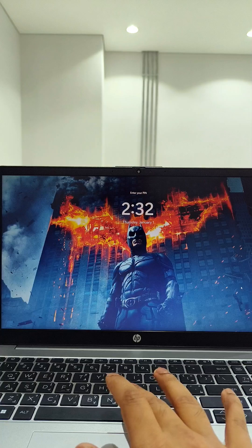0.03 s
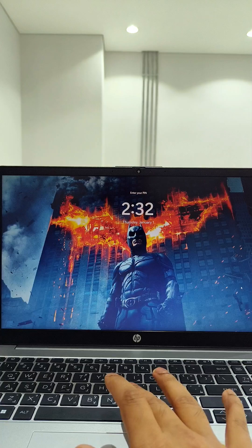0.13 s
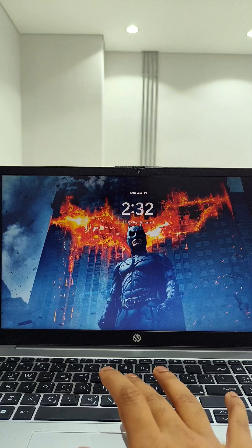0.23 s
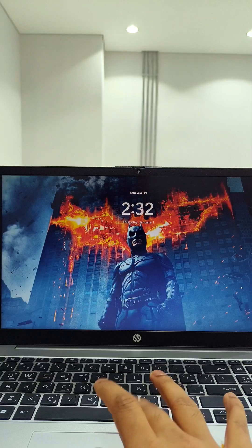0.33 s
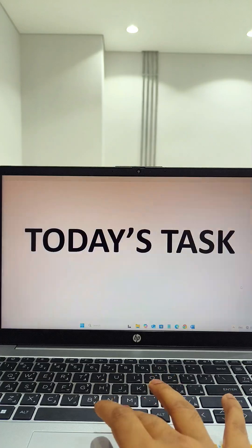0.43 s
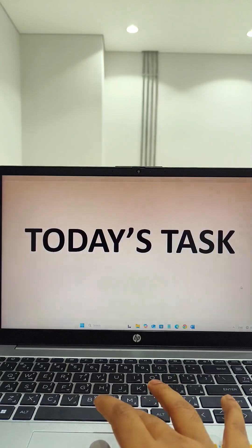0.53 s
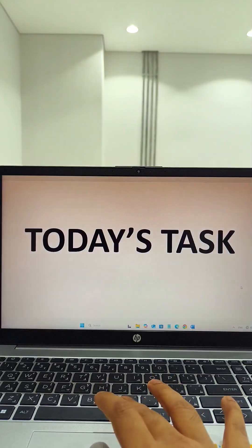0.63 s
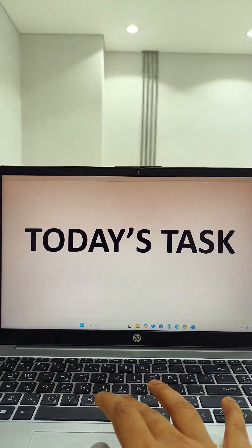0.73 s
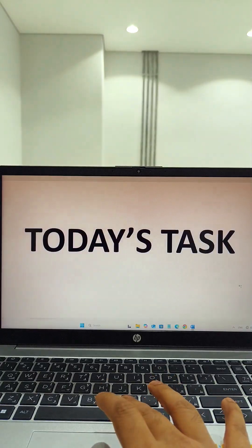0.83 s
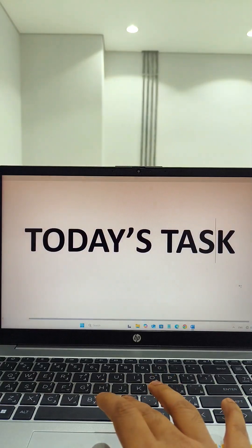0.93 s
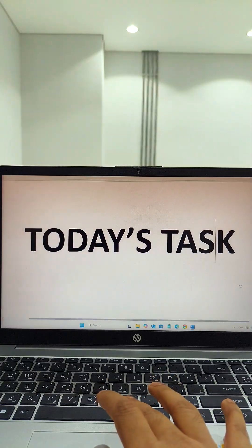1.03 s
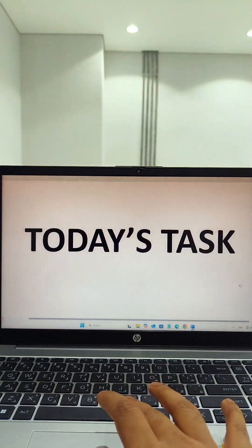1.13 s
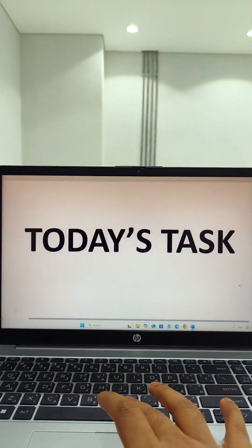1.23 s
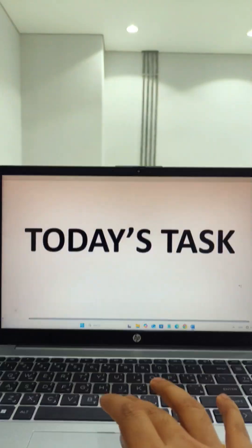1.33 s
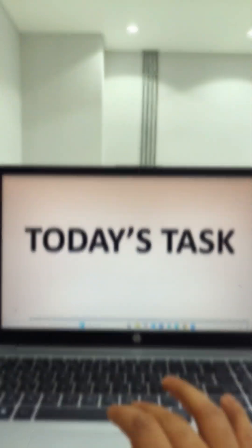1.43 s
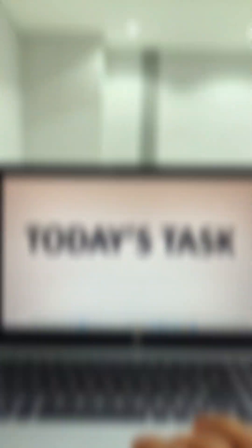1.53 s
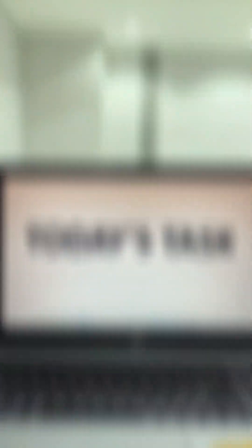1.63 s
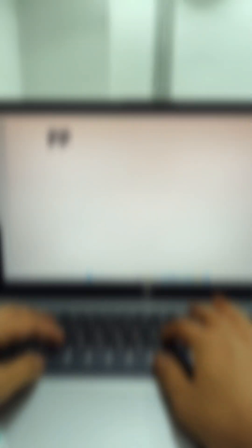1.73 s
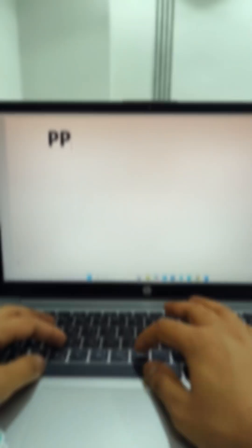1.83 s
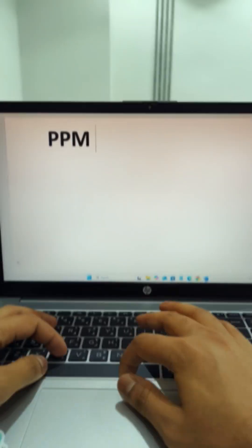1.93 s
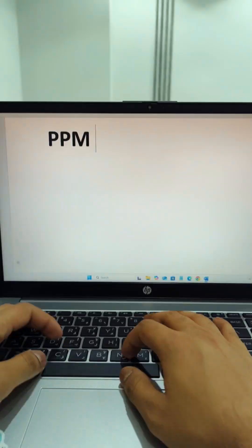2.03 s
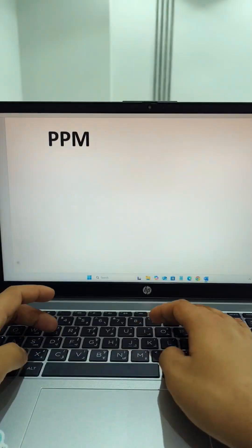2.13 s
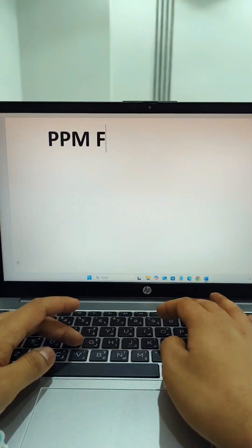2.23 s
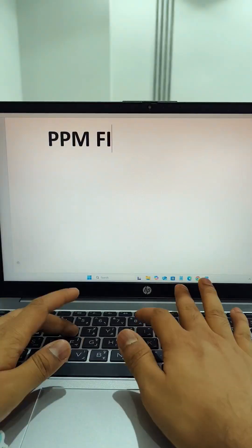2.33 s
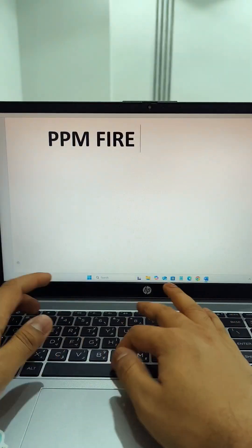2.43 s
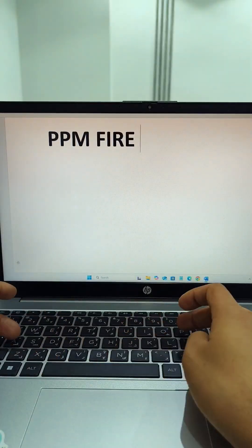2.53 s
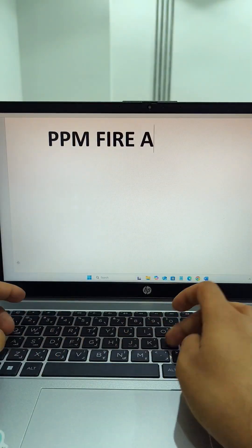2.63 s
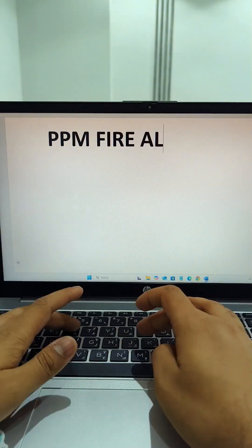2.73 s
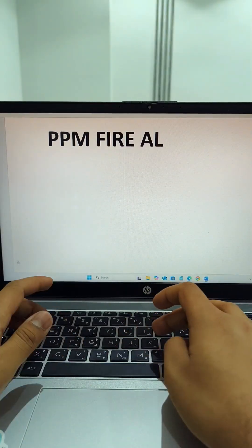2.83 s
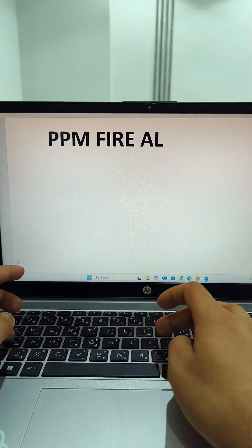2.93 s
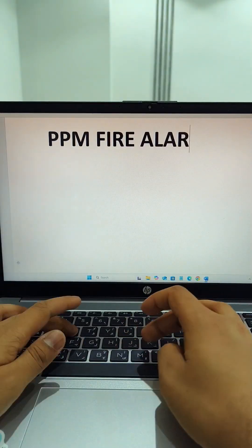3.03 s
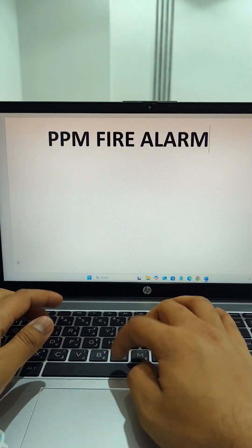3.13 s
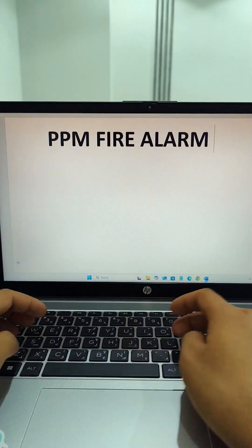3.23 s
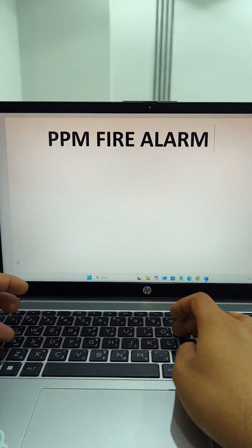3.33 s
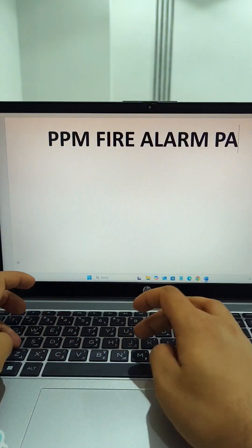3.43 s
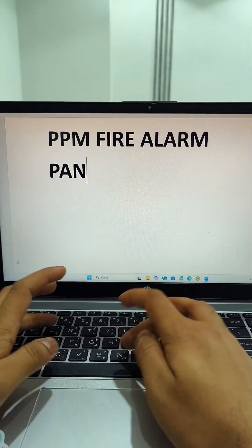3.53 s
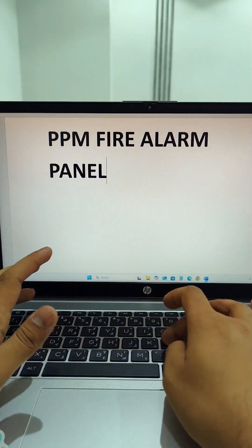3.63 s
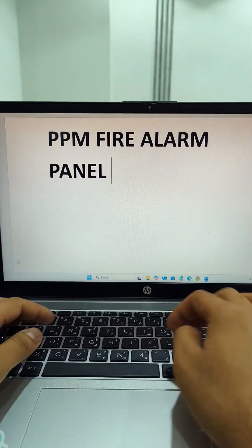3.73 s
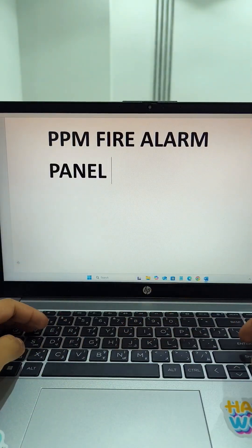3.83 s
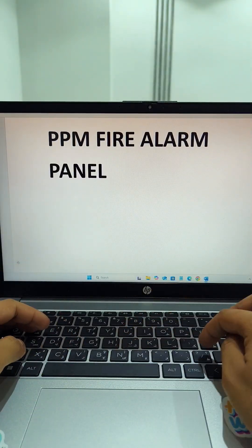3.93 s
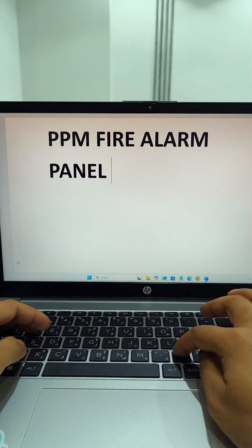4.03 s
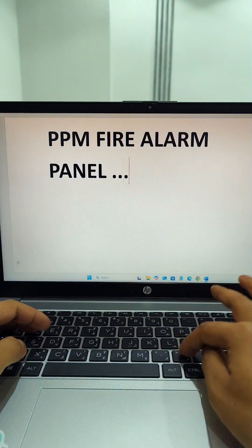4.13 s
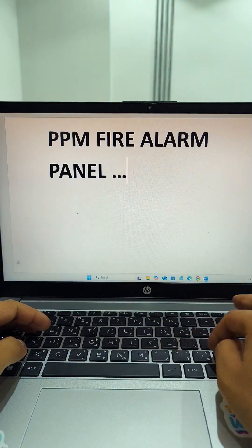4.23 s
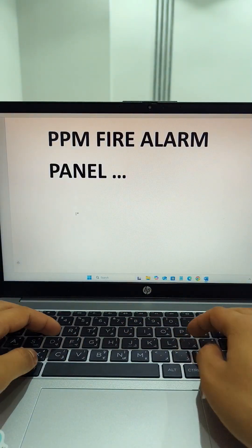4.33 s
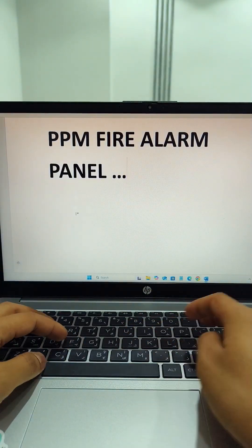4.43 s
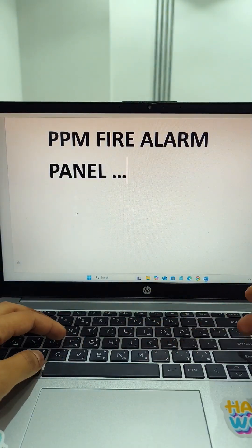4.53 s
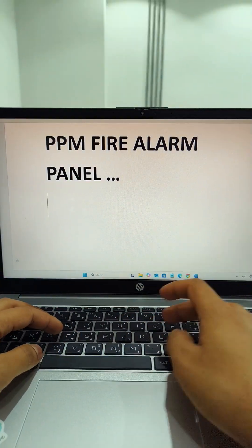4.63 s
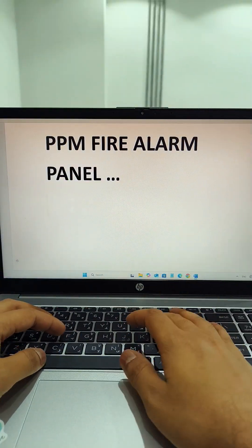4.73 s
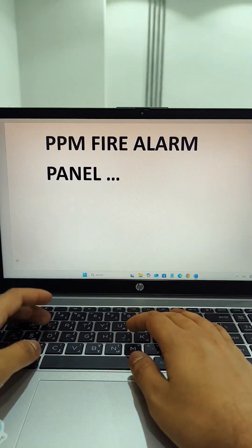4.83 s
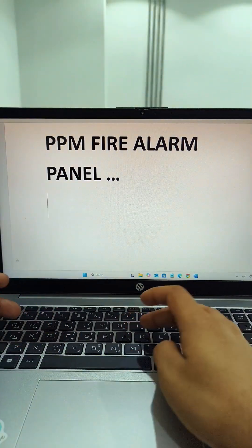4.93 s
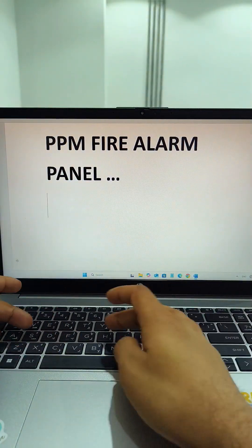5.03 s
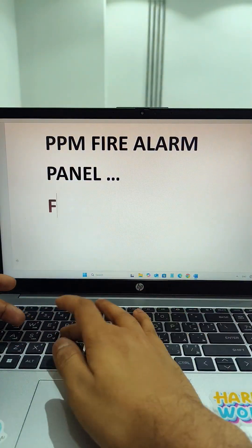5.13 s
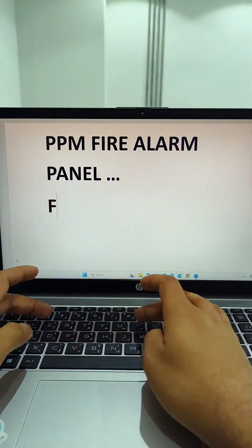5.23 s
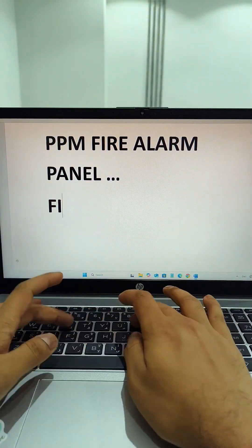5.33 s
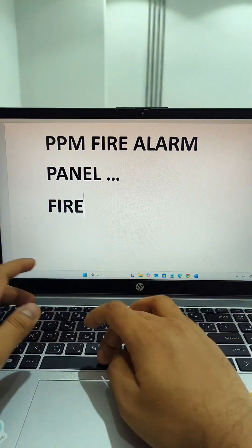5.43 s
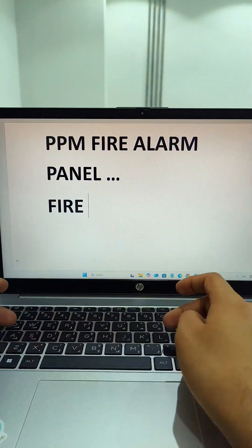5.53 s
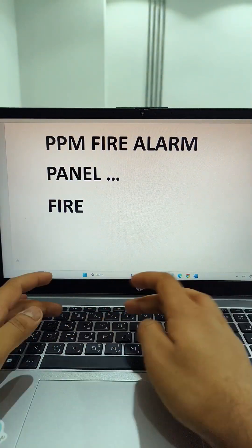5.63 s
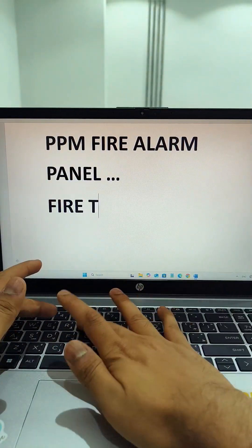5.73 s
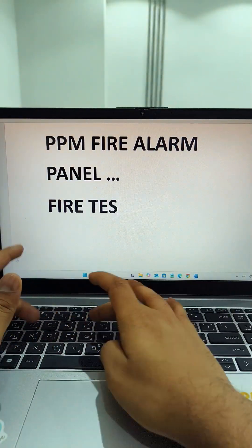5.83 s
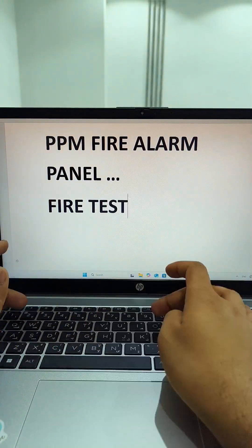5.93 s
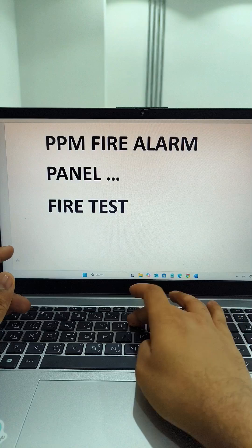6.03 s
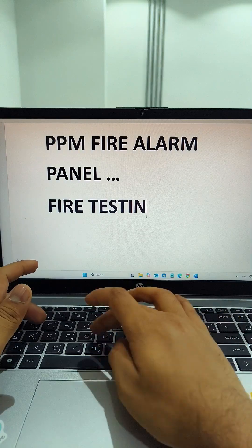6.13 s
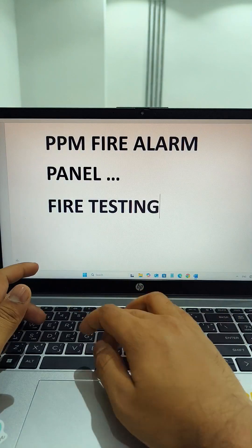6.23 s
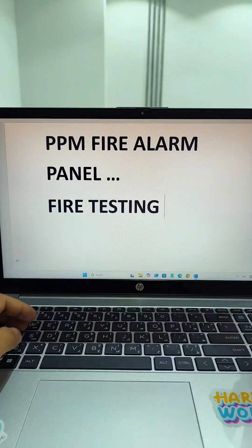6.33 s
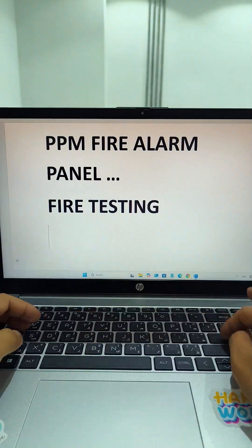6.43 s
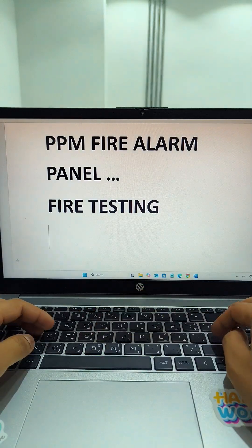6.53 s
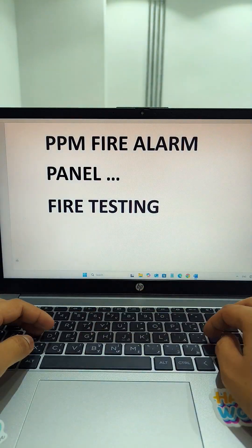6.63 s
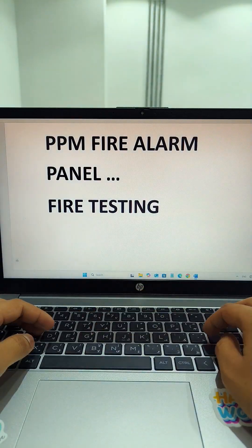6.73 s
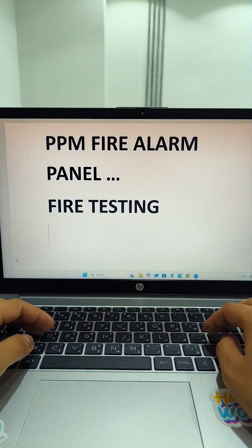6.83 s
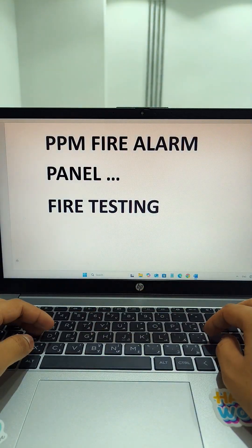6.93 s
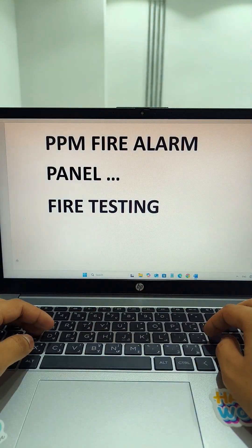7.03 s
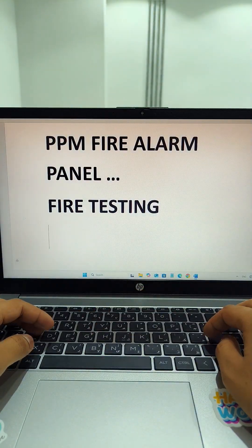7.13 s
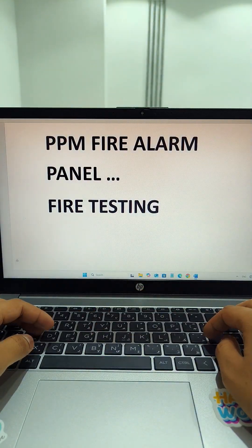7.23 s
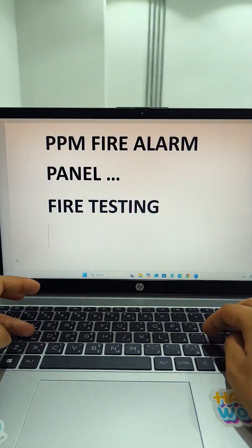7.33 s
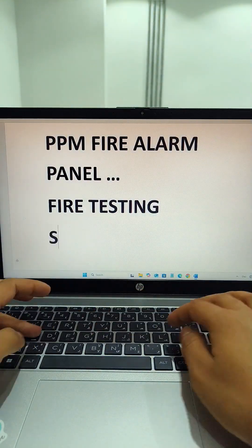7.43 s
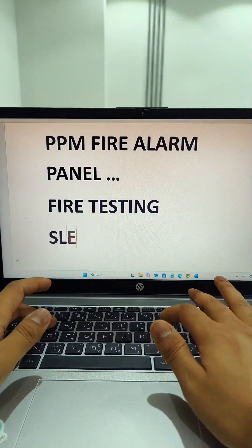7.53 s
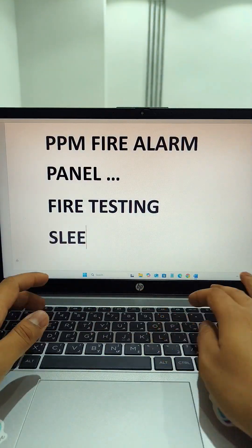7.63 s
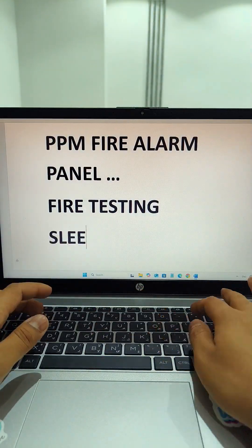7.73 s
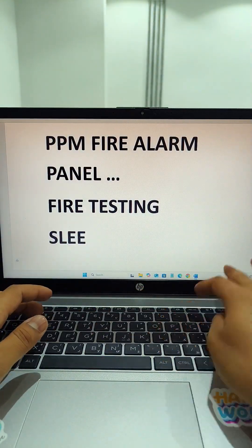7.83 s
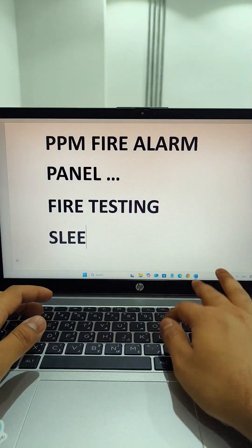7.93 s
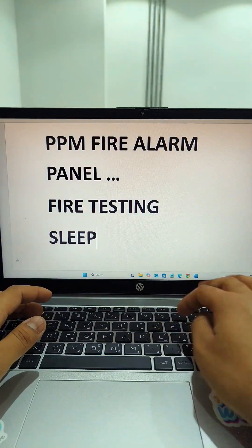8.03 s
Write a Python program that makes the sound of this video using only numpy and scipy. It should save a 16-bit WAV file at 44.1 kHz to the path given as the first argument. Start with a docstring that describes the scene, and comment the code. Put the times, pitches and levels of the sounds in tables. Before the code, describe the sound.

From 0 to 1.7 s the sound is wide and very quiet: a muted double-contact finger tap at 0.43 s, another at 0.63 and a weaker one at 1.35. They ring through a diffuse room tail, with a low boom that swells again and stops near 0.9 s, and a narrow wavering whistle around 800 Hz on the right. It fades, then cuts to close mono at 1.73 s, where low rumble and two motor hums near 63 Hz swell in, beating about one and a half times a second under a very faint steady whine. Fast uneven typing starts around 2.07 s: crisp clicks, softer releases, case knocks, thin ticks and skin brushing. The loudest strike, with a heavy desk thump, lands near 4.07 s. Dense clicks continue to about 6.6, thin out with a firm stroke at 7.23, then cluster again from 7.7 to 8.07 s.

```python
"""A quiet room with a laptop, in two scenes. First, in stereo, one finger taps three times: struck modes
ring on in a noisy room tail, with a low boom and a flickering whistle, a narrow wandering tone on the right.
After a cut, in mono, two hands type fast: bursts of noise ring the key clicks and case knocks, damped low
swings make the desk thump, and skin brushes plastic as grainy noise. Behind them two motors, nearly in tune,
beat slowly over a low rumble of filtered noise and a faint steady whine."""
import sys
import numpy as np
from scipy import signal
from scipy.io import wavfile
from scipy.ndimage import uniform_filter1d

SR = 44100
rng = np.random.default_rng(int(sys.argv[2]) if len(sys.argv) > 2 else 0)


def bounce(signal):
    """Save signal as a 16-bit WAV file at the path given by the first command-line argument."""
    frames = np.transpose(np.atleast_2d(signal))
    limited = np.clip(frames, -1, 1)
    pcm = np.round(limited * 32767).astype(np.int16)
    wavfile.write(sys.argv[1], SR, pcm)


N = 356724  # length in samples

# Key contacts, bottoming out or springing back. Each row: time in seconds, click level in dB,
# case knock in dB relative to the click, upper click in dB relative to the lower click.
KEY_CONTACTS = [(2.0664, -20, -8, -4), (2.156, -45.5, -5, -5), (2.1693, -35, -6, 3), (2.19, -20, -7.5, 2),
                (2.2798, -20, -9, 2), (2.4012, -28, -6.5, 5), (2.501, -23, -2.5, -5),
                (2.5131, -25, -12.5, 15), (2.5362, -36.5, -6.5, -11), (2.597, -38, -11, -3),
                (2.6058, -31, -12, -9), (2.6145, -30.5, -11.5, 2), (2.683, -46, -4.5, -16),
                (2.713, -27, -9.5, 4), (2.7711, -37, -5, 7), (2.9193, -38, -8, -4), (2.9427, -20, -13, -6),
                (3.0863, -22, -8.5, 0.5), (3.1788, -42.5, 1.5, 5), (3.2099, -21.5, -9, 10),
                (3.3183, -42.5, -2, -8), (3.498, -23.5, -9, -17.5), (3.511, -38.5, -0.5, 3),
                (3.5767, -38, -8, -23), (3.591, -24, -8, -1), (3.6891, -40.5, 0, 1), (3.6982, -43.5, -4, 0),
                (3.9191, -20.5, -9.5, 4.5), (3.962, -34, -7.5, -11), (4.07, -13.5, -11.5, -8),
                (4.0758, -7.5, -11, 6), (4.126, -35, -11, 0), (4.1466, -12.5, -4, 0.5),
                (4.168, -30.5, -13, -4), (4.2381, -24, -6, -8), (4.3312, -20.5, -3.5, 3.5),
                (4.4126, -39, 1.5, 0), (4.4412, -19, -11.5, 2), (4.467, -38, 7.5, -10),
                (4.4855, -40, 1.5, -9), (4.5489, -17, -9.5, -4), (4.6048, -33.5, -6, -3),
                (4.6695, -17.5, -12, 3), (4.7652, -30, -8, -2), (4.825, -18.5, -4, -1),
                (4.844, -27.5, -12, -5), (4.9516, -20.5, -3, -2), (5.0939, -14.5, -11, -0.5),
                (5.1863, -33.5, -5.5, 8.5), (5.351, -39.5, -11.5, 17), (5.3664, -47, 4.5, -1.5),
                (5.4381, -23.5, -8, -10.5), (5.5455, -33.5, -6.5, -8), (5.5645, -28, -4, 13),
                (5.5774, -16, -12.5, -2), (5.617, -41, 2, 4), (5.641, -33, -7, -6), (5.6518, -28.5, -6, 10),
                (5.695, -39.5, -7, -3), (5.7207, -41, -8, -6), (5.7456, -22.5, -5.5, -25),
                (5.784, -18.5, -10.5, 8), (5.8762, -45.5, 2.5, 16), (5.897, -44.5, 6, 11),
                (5.966, -19, -7.5, 0.5), (5.9995, -38, 5.5, 3), (6.074, -48, 6.5, -6.5),
                (6.098, -33.5, -15, -6), (6.127, -21, -3.5, -1.5), (6.224, -16, -14, 3),
                (6.2279, -19.5, -8.5, -7), (6.3436, -34, -1.5, -1), (6.353, -23.5, -10, 7),
                (6.4096, -25, -7, -4), (6.5153, -27, -28.5, -10), (6.5421, -40, -11.5, -2),
                (6.594, -19, -8, -2.5), (6.685, -47, -12, -6), (6.8981, -34.5, -12, 10),
                (6.9362, -37.5, 0.5, 0), (7.0455, -46, 1, -14), (7.0545, -24, 0, 3),
                (7.2287, -16, -7.5, -1.5), (7.339, -44, -7, -20), (7.356, -31.5, -8, -2),
                (7.434, -23, -12, -4), (7.7245, -41.5, -4.5, 9.5), (7.7532, -31, -9, 4.5),
                (7.8178, -26.5, -10.5, 1.5), (7.825, -18.5, -9, -13), (7.8973, -33, -8, -2),
                (7.9188, -27, 2, 10), (7.9452, -32, 5, 2), (7.9933, -33.5, 0, -12), (8.005, -18, -12.5, 22),
                (8.0115, -17, -7.5, 27), (8.0675, -28, -3, 0)]
# What a struck key rings with: four rows each for case knock, lower click, upper click and fizz.
# Each row: pitch in Hz, width in Hz, level in dB within its group of four.
KEY_MODES = [(369, 290, -20), (781, 154, -13.5), (979, 353, -2), (1433, 760, -7), (1775, 352, -5),
             (2426, 1110, -4.5), (3326, 330, -2), (3613, 1015, 0.5), (4175, 1160, 22), (4750, 2160, 2),
             (5030, 1900, 11), (6660, 2200, -41.5), (7185, 2700, 4.5), (9690, 1060, 1.5),
             (11870, 4900, -7.5), (14000, 1700, -26)]
# Thin high ticks, alone or on top of a stroke. Each row: time in seconds, level in dB.
TICKS = [(2.5654, -34.5), (2.645, -48), (3.19, -49), (4.069, -16), (4.1472, -17.5), (4.8255, -25.5),
         (4.9528, -34), (5.7655, -36.5), (5.967, -32.5), (6.049, -52), (6.128, -30.5), (6.223, -24),
         (6.2737, -40), (6.314, -50), (7.0561, -32.5), (8.0453, -36.5)]
# A small stiff part rings on after a tick. One row: pitch in Hz, width in Hz, level in dB relative to the tick.
TICK_RING = (9700, 250, -4.5)
# Heavy strokes and wrists shake the desk. Each row: start in seconds, level in dB, pitch in Hz.
THUMPS = [(2.253, -39.5, 340), (2.65, -43, 279), (3.067, -38.5, 407), (3.64, -39, 304), (3.812, -35.5, 194),
          (4.069, -10.5, 128.3), (4.142, -17, 169), (4.328, -23.5, 187), (4.545, -20, 83.4),
          (5.096, -26.5, 227), (5.78, -21.5, 95), (5.903, -36, 360), (5.996, -17.5, 129.5),
          (6.218, -21.5, 174), (6.936, -21, 135.6), (7.534, -41, 332), (7.817, -27, 325), (7.921, -20, 164),
          (8.0, -20.5, 230)]
# The room after a key. Each row: centre in Hz, level in dB, time to fade by 60 dB in seconds.
TYPING_ROOM = [(321.6, -13, 0.22), (974, -13, 0.13), (1870, -21, 0.13), (3820, -30.5, 0.23),
               (8000, -22.5, 0.092), (12220, -28, 0.21)]
# Fingers shifting between strokes. Each row: middle in seconds, level in dB, length in milliseconds.
RUSTLES = [(2.651, -44, 18), (3.025, -57, 45), (3.75, -55.5, 146), (4.537, -35, 6.8), (5.415, -47, 11),
           (5.6, -43.5, 30), (5.71, -51, 52), (6.698, -55, 19), (6.847, -46, 11.6), (7.028, -55.5, 57),
           (7.62, -64, 10)]
# The finger brushes the cap before a full stroke and slides off after it.
# Each is one row: middle in seconds from the click, level in dB, length in milliseconds.
LAND = (-0.015, -61.5, 25.7)
LIFT = (0.092, -60.5, 40.3)
# The tone of skin on plastic. Each row: pitch in Hz, width in Hz, relative level in dB.
BRUSH_MODES = [(374, 83, 8.5), (888, 1220, 3.5), (3590, 1650, -1.5), (8850, 5400, -14.5)]
# Turning rates of the two motors, nearly in tune. One row: first motor in Hz, second motor in Hz.
MOTORS_HZ = (62.53, 64.03)
# Motor hum and overtones. Each row: multiple of the turning rate, level of the first motor in dB rms.
MOTOR_ORDERS = [(1, -49), (2, -57.5), (3, -68)]
# Shape of the rumble. Each row: frequency in Hz, relative level in dB per Hz.
RUMBLE = [(20, 14.5), (43, 6.5), (80, -2), (150, -5.5), (340, -28.5), (700, -39), (1000, -43.5)]
# Finger taps of the first scene. Each row: time in seconds, level in dB, contact setting in milliseconds,
# treble in dB counted from 16 dB below the tap, thud in dB relative to the tap.
TAPS = [(0.435, -41, 10.4, 14.5, -15), (0.4414, -29.5, 1.33, -11, -0.5), (0.629, -34.5, 2.3, 5.5, 0),
        (1.349, -45.5, 1.6, -22, -20)]
# What a tap rings with: one row of thud, three of knock, then the treble.
# Each row: pitch in Hz, width in Hz, level in dB within its group.
TAP_MODES = [(187.6, 64, 3), (473, 38, -9), (658, 138, -3), (1620, 860, -25), (4400, 2700, -23.5),
             (9100, 1100, -28.5), (14700, 670, -18.5)]
# Path of the whistle. Each row: time in seconds, level in dB before panning, centre in Hz.
WHISTLE = [(.43, -90.5, 777), (.46, -51, 770), (.59, -60, 780), (.63, -50, 780), (.76, -61.5, 766),
           (.96, -59.5, 820), (1.09, -69.5, 800), (1.17, -53, 813), (1.3, -76.5, 810), (1.44, -65.5, 800),
           (1.6, -72, 765)]
# The room after a tap. Each row: centre in Hz, level in dB, time to fade by 60 dB in seconds.
TAP_ROOM = [(657, -21.5, 0.45), (1690, -22.5, 0.66), (3260, -15.5, 0.6), (7240, -14.5, 0.28),
            (12400, -16.0, 0.24)]

TRAVEL_S = .015  # a blow starts with this much key travel
SCATTER_DB = 4.5  # how far each mode varies from blow to blow
# a flat, heavy finger knocks the case more, stays longer in contact and fizzes more
CONTACT_MS, LONGER_PER_KNOCK_DB, LONGEST_MS = 3.2, 0.1345, 5.5
USUAL_KNOCK_DB = -8
FIZZ_DB, FIZZ_PER_KNOCK_DB = -16, 0.58
TICK_MS = 0.86
FULL_STROKE_DB = -30  # a louder click means the key is driven home
# every full stroke also shakes the base: level relative to click, middle pitch, pitch spread
BASE_DB, BASE_HZ, BASE_SPREAD = -24, 304, 0.2
THUMP_T60_S = 0.087  # time to fade by 60 dB
RUSTLE_SCATTER_DB, HISS_DB = 5, -77
IN_STEP_S = 3.08  # the moment the motors run in step
RUMBLE_DB = -42
WHINE_HZ, WHINE_DB = 1000, -79.5
CUT_S = 1.728  # typing begins
# the boom starts to stop short at BOOM_STOPS_S and leaves a faint rest
BOOM_DB, BOOM_T60_S, BOOM_STOPS_S, BOOM_REST_DB = -13.5, 0.74, 0.924, -85
RETURN_S, RETURN_DB, RETURN_WIDTH_S = .15, -18, .025  # its second swell after a tap
WHISTLE_WIDTH_HZ = 95
TOP_HZ = 16300  # nearly nothing passes above this


def undb(db):
    """Turn decibels into a plain gain."""
    return 10 ** (np.asarray(db, float) / 20)


def level(x, db):
    """Scale a sound to an average (rms) level in dB."""
    return x * undb(db) / np.sqrt(np.mean(x ** 2))


def ring(x, hz, width_hz):
    """One resonance, gain 1 at its centre."""
    return signal.lfilter(*signal.iirpeak(hz, hz / width_hz, SR), x)


def ring_twice(x, hz, width_hz):
    """Two equal resonances in a row, so the sides fall away faster."""
    return ring(ring(x, hz, width_hz), hz, width_hz)


def walk(rate):
    """A smooth random wander, with `rate` new values a second and a spread near 1."""
    hold = int(SR / rate)
    steps = np.repeat(rng.standard_normal(N // hold + 1), hold)
    return 0.95 * uniform_filter1d(uniform_filter1d(steps, hold), hold)[:N]


def blows(ms, grit_db):
    """One row per contact: a faint scrape as the key travels, then a gritty force that swells and dies."""
    t = np.arange(4096) / SR - TRAVEL_S
    u = np.maximum(t / (np.asarray(ms)[:, None] * 0.00047), 0)  # the force peaks at u = 1
    push = (u * np.exp(1 - u)) ** 0.65
    travel = undb(-30) * np.exp(-abs(t) / .004)
    chance = rng.standard_normal((len(ms), 2, 4096))
    return (push + travel) * chance[:, 0] * undb(grit_db * chance[:, 1])


def struck(force, modes, db):
    """Each blow lands elsewhere, so the modes answer in a new mix; db is its loudest 2 ms."""
    mix = undb(SCATTER_DB * rng.standard_normal((len(force), len(modes), 1)))
    y = 0
    for k, (hz, width, mode_db) in enumerate(modes):
        y = y + mix[:, k] * undb(mode_db) * ring_twice(ring(force, hz, width), hz, 2 * width)
    loudest = np.sqrt(uniform_filter1d(y ** 2, size=88).max(axis=1))
    return y * (undb(db) / loudest)[:, None]


def place(rows, times):
    """Lay the rows out in time."""
    out = np.zeros(N + rows.shape[1])
    for row, s in zip(rows, times):
        start = int(s * SR)
        out[start:start + len(row)] += row
    return out[:N]


def keys():
    """Cap and scissor click, the case knocks, a fizz tops it, and thin ticks join in."""
    s, db, case_db, upper_db = np.transpose(KEY_CONTACTS)
    heavy = case_db - USUAL_KNOCK_DB
    contact_ms = np.minimum(CONTACT_MS * np.exp(LONGER_PER_KNOCK_DB * heavy), LONGEST_MS)
    force = blows(contact_ms, grit_db=3.5)
    share = 1 / (1 + undb(-upper_db) ** 2)  # power share of the upper click
    case, lower, upper, fizz = np.split(np.array(KEY_MODES), 4)
    rows = struck(force, lower, db + 10 * np.log10(1 - share))
    rows += struck(force, upper, db + 10 * np.log10(share))
    rows += struck(force, case, db + case_db)
    rows += struck(force, fizz, db + FIZZ_DB + FIZZ_PER_KNOCK_DB * heavy)
    tick_s, tick_db = np.transpose(TICKS)
    flick = blows(np.full(len(TICKS), TICK_MS), grit_db=-4.0)
    ticks = struck(flick, fizz, tick_db) + struck(flick, [TICK_RING], tick_db + TICK_RING[2])
    return place(rows, s - TRAVEL_S) + place(ticks, tick_s - TRAVEL_S)


def full_strokes():
    """Times and click levels of the contacts where a key is driven home."""
    s, db = np.transpose(KEY_CONTACTS)[:2]
    return s[db > FULL_STROKE_DB], db[db > FULL_STROKE_DB]


def thumps():
    """A damped low swing of desk and base, with a weaker higher mode."""
    at, click_db = full_strokes()
    base_hz = BASE_HZ * np.exp(BASE_SPREAD * rng.standard_normal(len(at)))
    base = np.c_[at, click_db + BASE_DB, base_hz]
    s, db, hz = (c[:, None] for c in np.r_[THUMPS, base].T)
    t = np.arange(8192) / SR
    swing = np.sin(2 * np.pi * hz * t) + 0.37 * np.sin(2 * np.pi * 1.7 * hz * t)
    fade = undb(db - 60 * t / THUMP_T60_S) * np.minimum(t / 0.0025, 1)
    return place(fade * swing, s[:, 0])


def taps(pan_db, both):
    """Taps in one channel: a force partly shared with the other channel strikes thud, knock and treble."""
    s, db, ms, treble_db, thud_db = np.transpose(TAPS)
    thud, knock, treble = TAP_MODES[:1], TAP_MODES[1:4], TAP_MODES[4:]
    force = 0.4 * both + blows(ms, grit_db=5.0)
    rows = struck(force, thud, db + thud_db) + struck(force, knock, db)
    rows += struck(force, treble, db - 16 + treble_db + pan_db)
    dry_taps = place(rows, s - TRAVEL_S)
    return dry_taps + room(dry_taps, TAP_ROOM, flicker_db=1.5)


def boom():
    """Low noise that two contacts set off: it fades, swells again a moment later and stops short."""
    s, db, _, _, thud_db = np.transpose(TAPS)
    t = np.arange(N) / SR
    swell = 0
    for at, d in zip(s[1:3], db[1:3]):
        swell = swell + undb(d + BOOM_DB - 60 * (t - at) / BOOM_T60_S) * np.clip((t - at) / 0.018, 0, 1)
    # the swell after the last tap comes too late to be heard
    for at, d in zip(s[1:], db[1:] + thud_db[1:]):
        swell = swell + undb(d + RETURN_DB) * np.exp(-((t - at - RETURN_S) / RETURN_WIDTH_S) ** 2)
    swell = swell * np.clip((BOOM_STOPS_S - t) / .06 + 1, 0, 1) + undb(BOOM_REST_DB) * (t > s[1])
    tone = level(ring(ring(rng.standard_normal(N), 197, 31), 132, 100), 0)
    return tone * swell * undb([[-2.5], [1.5]])  # left, right


def whistle():
    """Two waves a quarter turn apart wander in strength, making a narrow noisy tone on the right."""
    when, *curves = np.transpose(WHISTLE)
    t = np.arange(N) / SR
    db, hz = (np.interp(t, when, c) for c in curves)
    turn = 2 * np.pi * np.cumsum(hz) / SR
    tone = walk(2 * WHISTLE_WIDTH_HZ) * np.cos(turn) + walk(2 * WHISTLE_WIDTH_HZ) * np.sin(turn)
    pan_db = np.array([[-18], [5]])  # left, right
    return level(tone, 0) * undb(db + 3.0 * walk(18.5) + pan_db)


def brushing():
    """Skin on plastic: grainy swells of noise over a faint hiss."""
    at = full_strokes()[0]
    chance = RUSTLE_SCATTER_DB * rng.standard_normal((len(at), 2))
    rows = list(RUSTLES)
    for s, two in zip(at, chance):
        for (ds, db, ms), c in zip((LAND, LIFT), two):
            rows.append((s + ds, db + c, ms))
    s, db, ms = (c[:, None] for c in np.transpose(rows))
    t = np.arange(-8192, 8192) / SR
    humps = undb(db) * np.exp(-(2000 * t / ms) ** 2)
    swell = place(humps, np.minimum(s[:, 0] + t[0], N / SR))
    grain = rng.standard_normal(N) * undb(4.5 * walk(300))
    rub = sum(undb(mode_db) * ring_twice(grain, hz, width) for hz, width, mode_db in BRUSH_MODES)
    hiss = ring(rng.standard_normal(N), 3000, 9000) * undb(3.2 * walk(3.2))
    return level(rub, 0) * swell + level(hiss, HISS_DB)


def room(x, bands, flicker_db):
    """Diffuse tail: in each third of an octave fresh, flickering noise follows the fading energy of the hits."""
    out = 0
    for centre, db, t60 in bands:
        keep = 10 ** (-6 / (t60 * SR))  # energy kept from sample to sample
        for hz in centre * 2 ** (np.arange(-1, 2) / 3):
            energy = signal.lfilter([1 / 88], [1, -keep], ring_twice(x, hz, hz / 3) ** 2)
            wash = ring_twice(rng.standard_normal(N), hz, hz / 4)
            out = out + level(wash * undb(flicker_db * walk(60)), db) * np.sqrt(energy)
    return out


def motors():
    """Two hums beat one and a half times a second, their overtones faster; the second is a little weaker."""
    t = np.arange(N) / SR - IN_STEP_S
    hum = 0
    for k, db in MOTOR_ORDERS:
        for hz, weak_db in zip(MOTORS_HZ, (0, -3)):
            hum = hum + np.sqrt(2) * undb(db + weak_db) * np.sin(2 * np.pi * k * hz * t)
    return hum


def rumble():
    """Half-octave bands of building noise, each wavering alone."""
    hz, db = np.transpose(RUMBLE)
    total = 0
    for f in 34 * 2 ** np.arange(0, 5.5, .5):
        band_db = np.interp(np.log(f), np.log(hz), db) + 5.36 * walk(8.7)
        total = total + undb(band_db) * ring_twice(rng.standard_normal(N), f, f / 2)
    return level(total, RUMBLE_DB)


def whine():
    """One faint steady sine tone."""
    return undb(WHINE_DB) * np.sin(2 * np.pi * WHINE_HZ * np.arange(N) / SR)


def hush():
    """Faint low and middle noise, separate in each channel."""
    low = level(ring(rng.standard_normal((2, N)), 180, 510), -81.5)
    middle = level(ring(rng.standard_normal((2, N)), 2200, 2000), -86.0)
    return low + middle


def first_shot():
    """The two channels hear each tap unlike; the whistle sits right, the boom near the middle."""
    both = blows(np.transpose(TAPS)[2], grit_db=11.0)
    stereo_taps = np.array([taps(pan_db, both) for pan_db in (1.5, -1.5)])
    return stereo_taps + whistle() + boom() + hush()


def scene():
    """Play the taps, then cut to the typing."""
    t = np.arange(N) / SR
    hits = keys() + thumps()
    swell_in = np.clip(0.45 + (t - CUT_S) / 0.61, 0, 1)  # the background swells in after the cut
    air = (motors() + rumble() + brushing() + whine()) * swell_in
    typing = hits + room(hits, TYPING_ROOM, flicker_db=6.5) + air
    # the first shot fades out just before the second cuts in
    fade_out = np.clip((CUT_S - .04 - t) / 0.092, 0, 1)
    return first_shot() * fade_out + typing * (t > CUT_S)


def record(dry):
    """The recorder rounds the loudest peaks and cuts the top."""
    rounded = 1.1 * np.tanh(dry / 1.1)
    low_pass = signal.ellip(18, .2, 110, TOP_HZ, fs=SR, output="sos")
    return signal.sosfilt(low_pass, rounded)


dry = scene()
out = record(dry)
bounce(out)
```